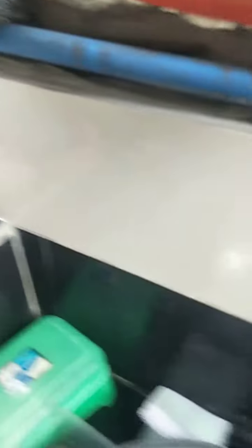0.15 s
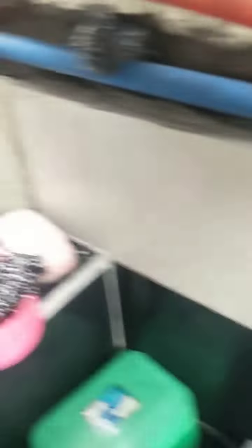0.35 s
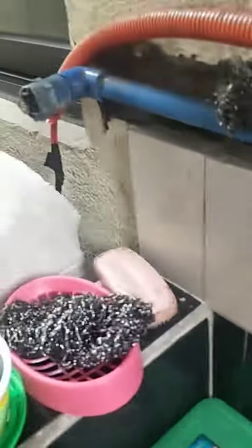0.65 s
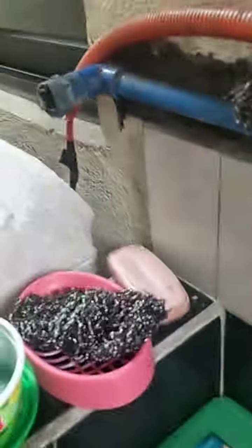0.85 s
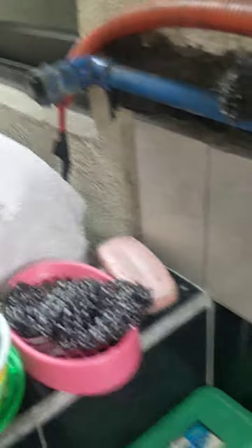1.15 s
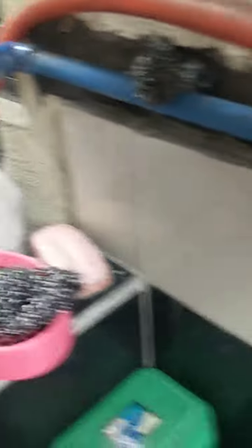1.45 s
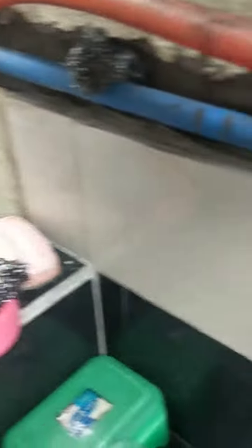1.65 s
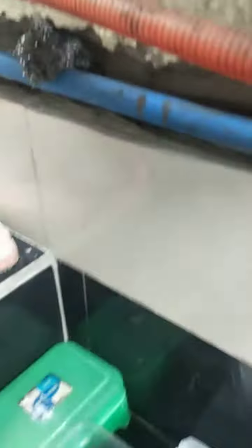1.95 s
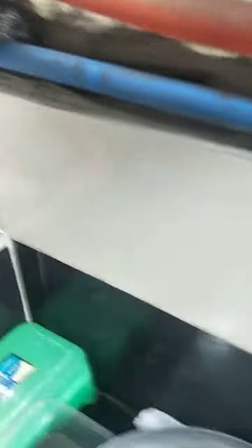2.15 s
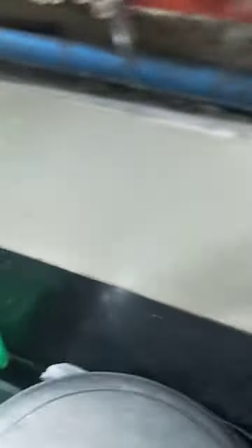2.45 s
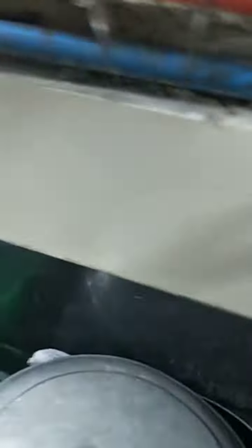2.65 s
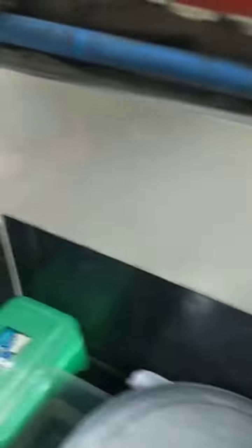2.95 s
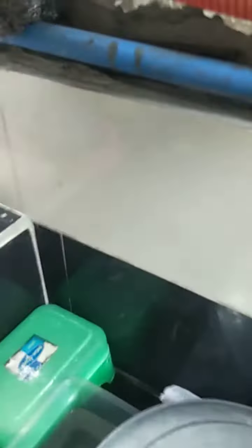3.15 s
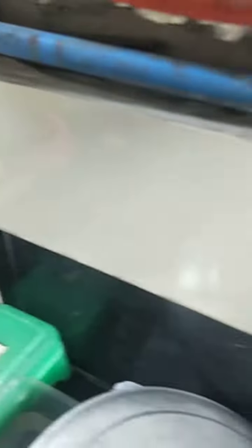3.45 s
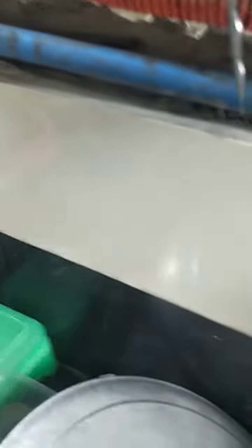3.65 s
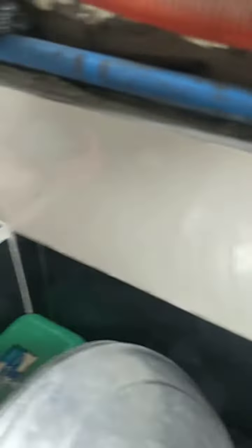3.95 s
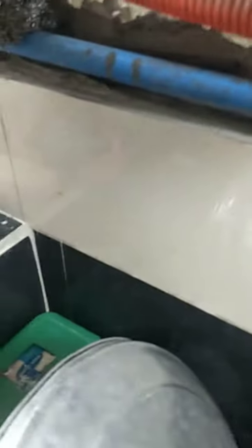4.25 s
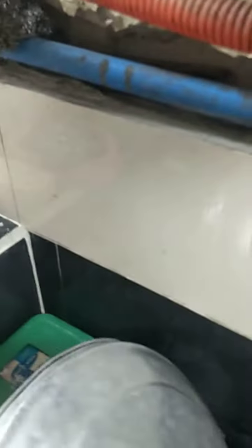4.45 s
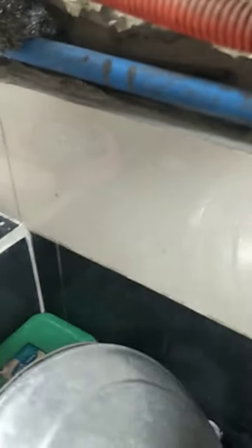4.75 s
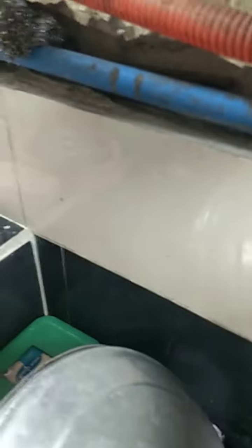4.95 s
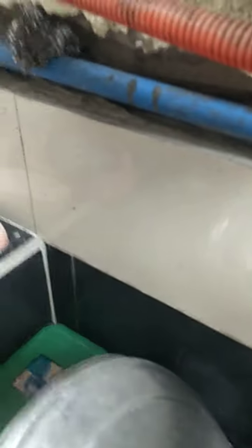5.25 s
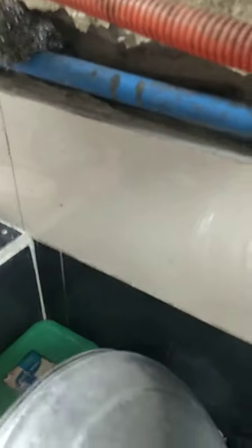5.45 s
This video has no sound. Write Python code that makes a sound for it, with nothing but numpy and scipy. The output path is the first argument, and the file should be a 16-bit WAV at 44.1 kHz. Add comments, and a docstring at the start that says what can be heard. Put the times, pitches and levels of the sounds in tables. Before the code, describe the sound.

A metal basin is shuffled and knocked about close by in a small tiled wash corner, scraping and ringing briefly. In a pause, low outdoor rumble and a little wind come through, with small ticks and a faint far rooster. Then a pail is set down and dragged with gritty scrapes and clanks. Rumble and a few ticks remain. The basin leans slightly right, the pail slightly left.

```python
"""A metal basin is shuffled and knocked about in a small tiled wash corner; friction and impact ring it.
From about 1.8 s a low outdoor rumble and a little wind fill the pause, small things tick, and a far cock
crows with thin high overtones among a few other faint far tones. From 3.1 s a pail is set down and
dragged. After 4.4 s rumble and wind remain, with a few ticks and one more faint tone. Of two microphone
ports the left hears the vessels slightly later; basin knocks and hiss lean right, pail knocks left."""
import sys
import numpy as np
from scipy import signal
from scipy.fft import rfft, irfft, next_fast_len
from scipy.io import wavfile
from scipy.ndimage import uniform_filter1d

SR = 44100
rng = np.random.default_rng(int(sys.argv[2]) if len(sys.argv) > 2 else 0)


def dump_mix(stems):
    """Bounce the given channels to the path in sys.argv[1] as a 16-bit WAV at rate SR."""
    frames = np.atleast_2d(stems).T  # one column per channel
    limited = np.clip(frames, -1, 1)  # hard clip at full scale
    pcm = np.round(limited * 32767).astype(np.int16)
    wavfile.write(sys.argv[1], SR, pcm)


N = 246959
PAIL_FROM_S = 3  # the basin is handled before this time, the pail after it


def amp(db):
    """Amplitude ratio of a level in decibels."""
    return np.exp(np.asarray(db) * np.log(10) / 20)


def unit_rms(x):
    """Normalisation to unit power."""
    return x / np.sqrt(np.mean(x ** 2) + 1e-20)


def curve_at(points, hz):
    """Interpolation on a logarithmic frequency axis."""
    f, value = np.transpose(points)
    return np.interp(np.log(hz + 1), np.log(f + 1), value)


def add(mix, start_s, sound):
    """Superposition: a sound joins the mix at its start time."""
    part = mix[..., round(start_s * SR):][..., :sound.shape[-1]]
    part += sound[..., :part.shape[-1]]


def coloured(x, spectrum, peaky_db=0):
    """Spectral shaping to unit power; random bumps stand for crowded modes."""
    size = next_fast_len(len(x))
    bumps = unit_rms(uniform_filter1d(rng.standard_normal(size // 2 + 1), 1 + size // 700))
    gain = amp(curve_at(spectrum, np.fft.rfftfreq(size, 1 / SR)) + peaky_db * bumps)
    return unit_rms(irfft(rfft(x, size) * gain, size)[:len(x)])


def vessel_modes(time_s):
    """Normal modes of the vessel in use; a hand on its wall damps some, weakening and shortening them."""
    # Each row: frequency in Hz, level in dB, free decay time (t60) in seconds.
    basin = [(318, -4, .12), (400, 0, .15), (428, -2, .15), (471, -1, .15), (518, -1, .15), (726, -3, .2),
             (847, -4, .15), (930, -4, .12), (1107, -12, .35), (1310, -19, .3), (1385, -18, .3),
             (1500, -13, .1), (1690, -5, .07), (1740, -15, .3), (1884, -10, .15), (2134, -14, .25),
             (2711, -6, .15), (2918, -11, .15), (3122, -9, .15), (3216, -3, .15), (3570, -13, .15),
             (3709, -11, .08), (4258, -11, .12), (4791, -17, .1), (5647, -18, .1), (6272, -18, .1)]
    pail = [(268, -6, .1), (340, -3, .15), (392, 0, .22), (419, -6, .15), (480, -3, .22), (510, -6, .15),
            (590, 0, .2), (712, -7, .15), (783, -1, .18), (909, -4, .18), (1045, -12, .12), (1385, -7, .18),
            (1520, -12, .15), (1747, 0, .1), (1800, 0, .12), (2143, -15, .15), (2345, -14, .15),
            (2468, -15, .15), (2760, -13, .13), (3047, -9, .13), (3520, -9, .11), (4060, -8, .13),
            (4420, -17, .12), (5566, -21, .12), (5803, -18, .12)]
    # Each row: start and end in seconds, lower and upper band edge in Hz, gain in dB.
    grips = [(1.05, 1.6, 500, 800, -9), (3.1, 3.14, 1300, 1600, -4), (3.5, 3.66, 330, 490, -4),
             (3.99, 5.6, 500, 730, -14), (4.27, 5.6, 2600, 6000, -14)]
    hz, db, t60 = np.transpose(basin if time_s < PAIL_FROM_S else pail)
    mute_db = sum(grip_db * ((low < hz) & (hz < high))
                  for start, end, low, high, grip_db in grips if start < time_s < end)
    return np.transpose([hz, db + mute_db, t60 * np.where(mute_db < 0, .4, 1)])


def impulse_response(modes, free, best_hz, db_per_octave, clang=0):
    """Modal sum: the contact point favours one pitch, a hard edge adds high modes, restraint damps all."""
    hz, db, t60 = np.transpose(modes)[..., None]
    t = np.arange(SR // 4) / SR
    excitation = amp(-db_per_octave * abs(np.log2(hz / best_hz))) + clang * (hz > 1250)
    sign = (-1) ** np.arange(len(hz))[:, None]  # neighbouring modes swing opposite ways
    decay = amp(db - 60 * t / np.clip(free * t60, .01, .3))
    return (sign * excitation * decay * np.sin(2 * np.pi * hz * t)).sum(0)


def rim_stroke(start_s, swell_s, fade_s, ring_db, best_hz, grit_db):
    """Stick-slip friction: a rim slips unevenly over gritty tiles, ringing the vessel and hissing."""
    # Each row: frequency in Hz, spectral density in dB.
    grit_spectrum = [(300, -24.5), (700, 2.5), (1300, -7.5), (2000, -6.5), (3000, -11), (4300, -19.5),
                     (6000, -21.5), (8000, -34.5), (10000, -40.5), (13300, -36), (15000, -62.5),
                     (15500, -76.5)]
    slips_per_s, rough_db = 3000, 3.1
    t = np.arange(SR * 3 // 5) / SR
    stages_s = np.cumsum(np.clip([0, swell_s, fade_s, .1], [0, .005, .015, .1], .4))
    from_peak = np.interp(t, stages_s, [-1, 0, 1, 3])
    envelope = amp(-13.5 * from_peak ** 2) * np.minimum(t / .0061, 1)
    strengths = amp(rough_db * np.minimum(rng.exponential(1, len(t)), 5))
    slipping = rng.random(len(t)) < slips_per_s / SR
    slips = unit_rms(strengths * slipping * rng.choice([-1, 1], len(t)))
    catches = unit_rms(uniform_filter1d(rng.standard_normal(len(t)), 350))  # the rim catches and lets go
    envelope *= amp(4 * catches - 2)
    free = .17 if start_s < PAIL_FROM_S else .24  # share of the decay time left under the hand
    response = impulse_response(vessel_modes(start_s), free, best_hz, db_per_octave=13)
    ring = amp(ring_db) * signal.oaconvolve(envelope * slips, response / np.linalg.norm(response))[:len(t)]
    common, *port_noises = rng.standard_normal((3, len(t)))
    hz = np.geomspace(300, 15500, num=50)
    # Each stroke hisses through one wet resonance; harder strokes hiss brighter.
    wet_db = 10 * np.exp(-(np.log2(hz / rng.uniform(2600, 4400)) / .22) ** 2)
    bright_db = .56 * max(grit_db + 41.5, 0) * np.exp(-(np.log2(hz / 6000) / .8) ** 2)
    spectrum = np.transpose([hz, curve_at(grit_spectrum, hz) + wet_db + bright_db])
    hiss = [coloured(slips + .19 * common + 7 * own, spectrum, peaky_db=2.5) for own in port_noises]
    return ring * amp([[-.6], [.6]]) + amp(grit_db) * envelope * hiss * amp([[-2.5], [2.5]])


def wall_reflections(x):
    """Reverberation: sparse echoes of random sign, each band decaying at its own rate."""
    # Each row: frequency in Hz, reverberation time (t60) in seconds.
    decay_times = [(200, 0.25), (1000, 0.18), (4000, 0.19), (12000, 0.0093)]
    echoes = np.zeros((2, SR // 2))
    arrivals = np.arange(120, SR // 2 - 20, 20) + rng.integers(0, 20, (2, (SR // 2 - 121) // 20))
    np.put_along_axis(echoes, arrivals, rng.choice([-1., 1.], arrivals.shape), 1)
    hz, t, spectra = signal.stft(echoes, SR, nperseg=256)
    apart = np.clip(hz / 700, 0, 1)[:, None]  # both ports hear the same bass
    spectra[0] = apart * spectra[0] + np.sqrt(1 - apart ** 2) * spectra[1]
    t60 = np.clip(curve_at(decay_times, hz), .03, 1)[:, None]
    tail = signal.istft(spectra * amp(-60 * t / t60), SR, nperseg=256)[1]
    return signal.fftconvolve(x[None], tail / np.linalg.norm(tail[1]), axes=1)[:, :N]


def outdoor_rumble():
    """Partly coherent noise at two ports; patches of its spectrum drift and the middle swells and sinks."""
    # Each row: frequency in Hz, spectral density in dB.
    spectrum = [(30, -31), (60, 4), (100, -11.5), (152, 3), (200, -15.5), (306, -11.5), (451, -11),
                (613, -19.5), (1130, -21), (1970, -23.5), (2900, -30.5), (3500, -36), (4200, -57),
                (8000, -72), (15500, -93.5)]
    # Each row: frequency in Hz, correlation between left and right.
    correlations = [(60, 1), (180, 0.99), (550, 0.59), (1650, -0.19), (4970, -0.84)]
    # Each row: time in seconds, gain in dB where the swell is deepest.
    swell = [(0, 4), (.7, -3.5), (1.5, -4), (1.951, -6.5), (2.6, -10), (2.95, -1.5), (3.5, -7), (4.4, -8),
             (5.1, -6), (5.6, -12)]
    frames, hz = N // 256 + 5, np.fft.rfftfreq(1024, 1 / SR)
    left_re, left_im, own_re, own_im, patches = rng.standard_normal((frames, 513, 5)).T
    patches = unit_rms(uniform_filter1d(uniform_filter1d(patches, 10, 0), 14, 1))
    swell_db = np.interp(np.arange(frames) * 256 / SR, *np.transpose(swell))
    swell_depth = curve_at([(150, .15), (300, 1), (700, .48), (1500, 1), (4000, .65)], hz)[:, None]
    alike = np.clip(curve_at(correlations, hz), -1, 1)[:, None]
    left = left_re + 1j * left_im
    right = alike * left + np.sqrt(1 - alike ** 2) * (own_re + 1j * own_im)
    spectra = np.array([left, right]) * amp(curve_at(spectrum, hz))[:, None]
    steady = signal.istft(spectra, nperseg=1024, noverlap=768)[1]
    spectra *= amp(-46.5) / np.sqrt(np.mean(steady ** 2))
    spectra *= amp(2.18 * patches + swell_depth * swell_db)
    return signal.istft(spectra, nperseg=1024, noverlap=768)[1][:, :N]


def wind():
    """Turbulence at the ports: puffs of low noise, uncorrelated between left and right."""
    # Each row: peak time in seconds, half width in seconds, level in dB.
    gusts = [(.45, 0.35, -47), (2.1, 0.087, -44.5), (2.34, 0.037, -45), (2.7, 0.89, -60),
             (3.701, 0.76, -55.5), (5.6, 0.045, -41)]
    # Each row: frequency in Hz, spectral density in dB.
    spectrum = [(15, -15), (35, 3.5), (70, 10), (110, -3), (180, 3), (300, -55.5)]
    t = np.arange(N) / SR
    envelope = amp(-60) + sum(amp(db) * np.exp(-((t - peak) / width) ** 2) for peak, width, db in gusts)
    noise = np.array([coloured(x, spectrum) for x in rng.standard_normal((2, N))])
    return noise * envelope * amp([[1.5], [-2.5]])


def blow(start_s, db, best_hz, free, clang_db, thud_hz, thud_db, thud_t60, crash_db, sizzle_db, tick_db):
    """Impact excitation: a short push and its dying chatter ring the vessel, and the floor thuds."""
    # Each row: frequency in Hz, spectral density in dB.
    crash_spectrum = [(500, -33.5), (900, 21), (1500, 13), (3000, 3.5), (4200, -5.5), (5500, -46.5),
                      (8000, -59.5)]  # dense middle modes of sheet metal
    sizzle_spectrum = [(2500, -9.5), (4200, 0), (5600, -5.5), (7000, -13), (9500, -29), (13500, -25.5),
                       (15000, -38), (15500, -62.5)]  # its densest top modes, which build up a little late
    contact_spectrum = [(3000, -34.5), (6000, 4.5), (9500, -5.5), (13500, -8.5), (15500, -5)]  # bright tick just after the push
    t, noise = np.arange(SR // 3) / SR, rng.standard_normal((4, SR // 3))
    force = .035 * noise[0] * amp(-60 * t / .04)  # chatter
    force[:9] += np.hanning(9) / 4  # push
    response = impulse_response(vessel_modes(start_s), free, best_hz, db_per_octave=8, clang=amp(clang_db))
    ring = signal.oaconvolve(force, response)[:len(t)]
    slab_boom = amp(-19.5 - 60 * t / .051) * np.sin(2 * np.pi * 179 * t)
    contact = coloured(noise[3], contact_spectrum) * amp(tick_db) * np.exp(-((t - .007) / .0025) ** 2)
    thud = amp(thud_db - 60 * t / max(thud_t60, .008)) * np.sin(2 * np.pi * thud_hz * t)
    thud *= np.minimum(t / .0007, 1)
    crash = coloured(noise[1], crash_spectrum, peaky_db=3) * (1 - np.exp(-t / .0015))
    sizzle = coloured(noise[2], sizzle_spectrum, peaky_db=6.5) * (1 - np.exp(-(t / .0056) ** 2))
    sizzle *= amp(sizzle_db - 6.5 - 260 * t)
    crash_t60 = np.interp(free, [0, 1], [.027, .45])
    dense_modes = (crash + sizzle) * amp(crash_db - 60 * t / crash_t60)
    sound = amp(db) * (ring / abs(ring).max() + thud + slab_boom + contact + dense_modes)
    pan_db = -5 if start_s < PAIL_FROM_S else 3  # left minus right; only the treble leans
    treble = signal.lfilter(*signal.butter(2, 590, "high", fs=SR), sound)
    return sound + (amp([[pan_db / 2], [-pan_db / 2]]) - 1) * treble


def tick(db, hz, t60):
    """Band-limited noise with exponential decay: the dull puff of a small tick or drip."""
    t = np.arange(SR // 3) / SR
    band = [(hz / 4, -22), (hz * 1.1, -6), (hz, 0), (hz * 1.09, -7), (hz * 1.76, -26), (hz * 4, -40)]
    envelope = amp(db - 60 * t / np.clip(t60, .02, .5)) * (1 - np.exp(-t / .0075))
    return coloured(rng.standard_normal(len(t)), band) * envelope


def distant_note(length_s, hz, *partials_db):
    """Harmonic series of a crow or faint tone: the pitch arches slightly and wavers with the level."""
    progress = np.linspace(0, 1, round(length_s * SR))
    waver = unit_rms(uniform_filter1d(rng.standard_normal(len(progress)), 500))
    arch = np.sin(np.pi * progress) - 1
    cycles = np.cumsum(hz * (1 + .012 * arch + .014 * waver)) / SR
    tone = sum(amp(db) * np.sin(2 * np.pi * k * cycles) for k, db in enumerate(partials_db, 1))
    envelope = amp(4 * waver - 5 * progress ** 2) * signal.windows.tukey(len(progress), .6)
    return np.sqrt(2) * tone * envelope


def scene():
    """Superposition of direct and reflected sound; the left port hears the vessels slightly later."""
    # Each row: start, swell and fade in seconds, ring level in dB, best-excited pitch in Hz,
    # grit level in dB.
    strokes = [(0, 0.022, 0.033, -43.5, 860, -44.5), (.041, 0.048, 0.28, -53, 445, -49),
               (.154, 0.032, 0.084, -57, 1074, -46.5), (.231, 0.0089, 0.14, -50.5, 528, -48.5),
               (.359, 0.025, 0.29, -43.5, 414, -50), (.48, 0.048, 0.02, -41, 1490, -42),
               (.547, 0.035, 0.089, -62, 700, -41), (.583, 0.023, 0.036, -32.5, 370, -40),
               (.652, 0.042, .05, -44, 440, -48.5), (.75, 0.013, 0.015, -25, 2900, -20),
               (.803, 0.061, 0.082, -39.5, 380, -45), (.946, 0.034, 0.23, -49.5, 390, -53.5),
               (1.118, 0.041, 0.061, -30.5, 480, -44), (1.225, 0.046, 0.082, -39.5, 476, -48.5),
               (1.29, 0.057, 0.081, -32.5, 445, -44.5), (1.388, 0.055, 0.063, -45, 1250, -46.5),
               (1.57, 0.11, 0.2, -58, 686, -50), (1.738, .01, 0.5, -59, 393, -70.5),
               (3.138, 0.008, 0.11, -41, 430, -42), (3.249, .02, .33, -51, 444, -63),
               (3.379, 0.013, 0.04, -52, 1810, -48.5), (3.63, 0.093, 0.051, -38.5, 390, -53.5),
               (3.68, 0.11, 0.17, -33, 306, -40), (3.757, 0.018, 0.057, -30, 1800, -49),
               (3.8, 0.043, .04, -24.5, 1690, -27.5), (3.855, 0.019, 0.051, -25.5, 637, -30.5),
               (3.895, 0.03, 0.021, -23, 736, -32), (3.9, 0.016, 0.089, -41, 930, -44.5),
               (3.955, .02, .02, -50, 4060, -38), (3.99, .03, 0.13, -42, 835, -48),
               (4.06, 0.073, 0.067, -52, 2980, -46), (4.13, 0.033, 0.048, -46.5, 805, -50),
               (4.19, 0.026, 0.071, -53, 3050, -46.5), (4.235, 0.043, 0.064, -50, 3500, -50),
               (4.292, 0.0072, 0.064, -36, 430, -51.5)]
    # Each row: start in seconds, level in dB, best-excited pitch in Hz, freedom to ring from 0 (held)
    # to 1, clang in dB, thud pitch in Hz, thud level in dB, thud t60 in seconds, then crash, sizzle
    # and tick in dB. Sizzle is relative to the crash; thud, crash and tick are relative to the ring.
    blows = [(.334, -17, 910, 0.25, -50, 330, 2, 0.025, -15.5, -9.5, -45),
             (.377, -38, 407, 0.77, -32, 332, -6, 0.054, -9.5, -4, -39),
             (.636, -24.5, 560, 0.08, -30.5, 490, 14, 0.01, -20.5, -2, -37),
             (.7075, -9, 750, .8, 2, 205, 6, .018, -15, 3, -26),
             (.734, -13, 463, 0.82, -31, 323, -8, 0.016, -18, -15, -48),
             (.748, -8, 754, 0.75, -17.5, 341, 1, 0.039, -17.5, 15, -35.5),
             (.878, -38.5, 490, 0.09, -18, 480, 15.5, 0.094, 0, 9, -22),
             (1.110, -13, 820, 0.55, -33, 406, 6, 0.026, -13.5, -5, -42),
             (1.146, -26.5, 870, 0.6, -25, 430, 9, 0.021, -16, -12, -47),
             (1.363, -23, 494, 0.03, -36, 211, 8, 0.023, -31, -7, -61),
             (1.378, -10.5, 900, 0.02, -19.5, 455, 1.5, 0.023, 1, -8, -34.5),
             (1.475, -32, 910, 0.1, -48, 219, 3.5, 0.016, -16, -9, -55),
             (1.603, -44.5, 2560, 0.01, -7, 404, 8, 0.02, -0.5, 13, -22),
             (1.679, -27, 1520, 0, 9, 507, 3, 0.011, 7, -17, -19),
             (1.758, -37.5, 1610, 0.01, -18, 349, 5, 0.028, 5.5, 0.5, -19),
             (3.1214, -9, 800, 0.33, -4, 389, 4.5, 0.046, -11, -3, -42),
             (3.148, -13, 1000, 0.15, -9, 380, -6, 0.017, -29, -9, -53),
             (3.168, -25, 430, 0, -22, 426, 12, 0.032, -15, -7, -60),
             (3.222, -32, 700, 0.12, -15, 420, 12.5, 0.018, -15, 11, -46),
             (3.37, -22.5, 447, 0.25, -8.5, 302, 14.5, 0.012, -12.5, -11, -58),
             (3.632, -31, 700, 0.05, -34, 316, 15.5, 0.038, -42, 3, -59),
             (3.668, -37, 1760, 1, -27, 321, 13.5, 0.026, -4.5, -17, -52),
             (3.71, -25, 400, 0.09, -35, 325, 1, 0.019, -11.5, -8, -55),
             (3.749, -21, 450, 1, -27, 310, 2.5, .025, -12, -8, -55),
             (3.763, -27, 500, .2, -30, 330, 3, .025, -18, -8, -55),
             (3.826, -11, 1800, .55, -25, 345, -12, .03, -18, -8, -50),
             (3.851, -10, 1750, .65, -25, 300, -25, .03, -25, -8, -50),
             (3.855, -12, 684, 0.71, -19.5, 307, 0.5, 0.037, -9, -6, -52),
             (4.007, -20.5, 1110, 0.33, -17, 289, 0, 0.057, -15, -11, -52),
             (4.172, -29, 800, 0.28, -12, 293, 1.5, 0.068, -16, 0, -51),
             (4.282, -13.5, 1080, 0.07, -30, 296, -14, 0.022, -26, -4, -52),
             (4.288, -23, 734, 0.09, -33, 279, 0.5, 0.044, -13, -5, -59)]
    # Each row: start in seconds, level in dB, centre frequency in Hz, t60 in seconds.
    ticks = [(1.829, -62, 2220, 0.11), (1.997, -56.5, 3940, 0.24), (2.0948, -57.5, 2470, 0.23),
             (2.399, -47.5, 2370, 0.11), (2.421, -63.5, 5860, 0.12), (2.4375, -61.5, 3000, 0.28),
             (2.538, -54.5, 1990, 0.12), (3.3012, -63, 3170, 0.21), (4.4582, -49.5, 2200, 0.039),
             (4.505, -59, 2280, 0.21), (4.955, -67, 3600, 0.6), (5.578, -61.5, 2287, 0.086)]
    # Each row: start and length in seconds, pitch in Hz, levels of the first two partials in dB.
    cock_crow = [(1.95, .32, 905, -76, -68), (2.26, .16, 985, -72, -67), (2.4, .17, 915, -69, -65),
                 (2.53, .32, 1000, -64, -67), (2.7, .38, 910, -78, -69)]
    # The crow's thin high overtones (4130 and 3010 Hz) and a few other faint far tones.
    # Each row: start and length in seconds, pitch in Hz, level in dB.
    thin_tones = [(2.33, .13, 840, -67), (2.58, .22, 1150, -69), (2.08, .2, 3160, -74),
                  (2.6, .18, 4130, -82), (2.65, .16, 3010, -79), (5.31, .25, 3110, -75)]
    near, far = np.zeros((2, N)), np.zeros(N)
    for start_s, *settings in blows:
        add(near, start_s, blow(start_s, *settings))
    for start_s, *settings in strokes:
        add(near, start_s, rim_stroke(start_s, *settings))
    # Small vessels radiate no deep bass.
    near = signal.sosfilt(signal.butter(3, 140, "high", fs=SR, output="sos"), near)
    for start_s, *settings in ticks:
        add(far, start_s, tick(*settings))
    for start_s, length_s, hz, first_db, second_db in cock_crow:
        add(far, start_s, distant_note(length_s, hz, first_db, second_db, second_db - 26))
    for start_s, *settings in thin_tones:
        add(far, start_s, distant_note(*settings))
    room = wall_reflections(amp(-9) * near.mean(0) + amp(-3) * far)
    treble_trim, trim_hz, lag_samples = .033, 815, 17
    near[0] -= treble_trim * signal.lfilter(*signal.butter(1, trim_hz, "high", fs=SR), near[0])
    near[0] = np.pad(near[0], (lag_samples, 0))[:N]
    return near + room + amp(1.5) * far + outdoor_rumble() + wind()


def record(dry):
    """Band limiting: a linear-phase low-pass filter at 15.5 kHz."""
    return signal.oaconvolve(dry, signal.firwin(511, 15500, window=("kaiser", 9), fs=SR)[None], "same")


dry = scene()
out = record(dry)
dump_mix(out)
```